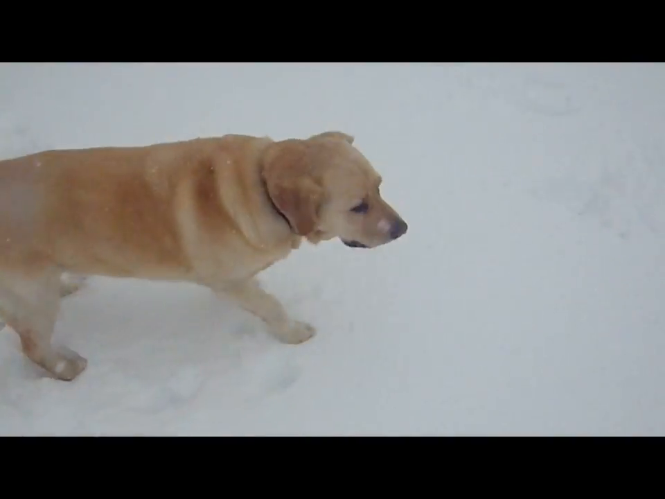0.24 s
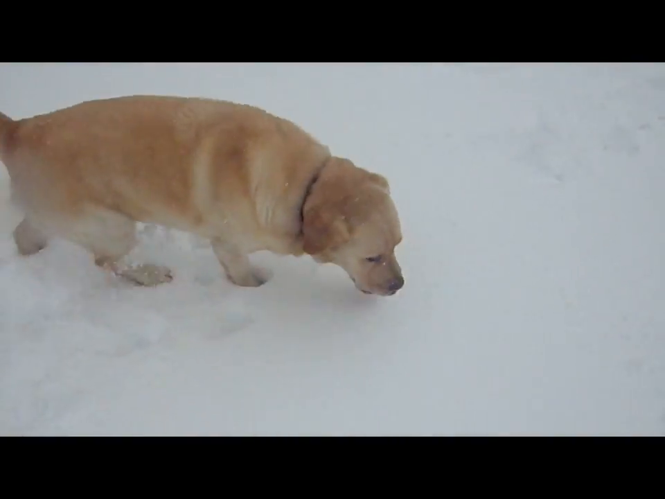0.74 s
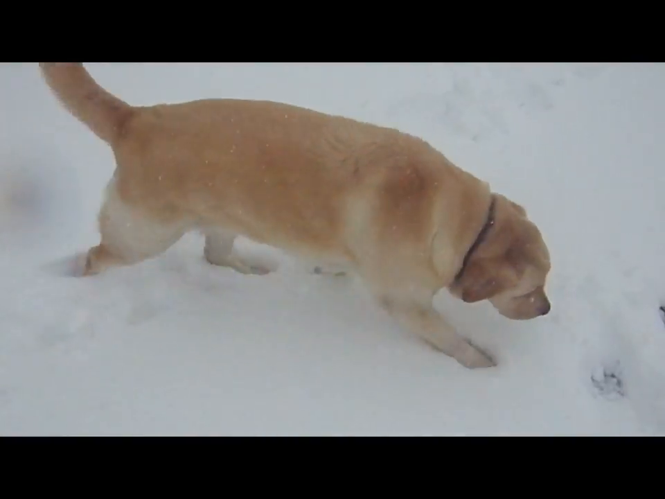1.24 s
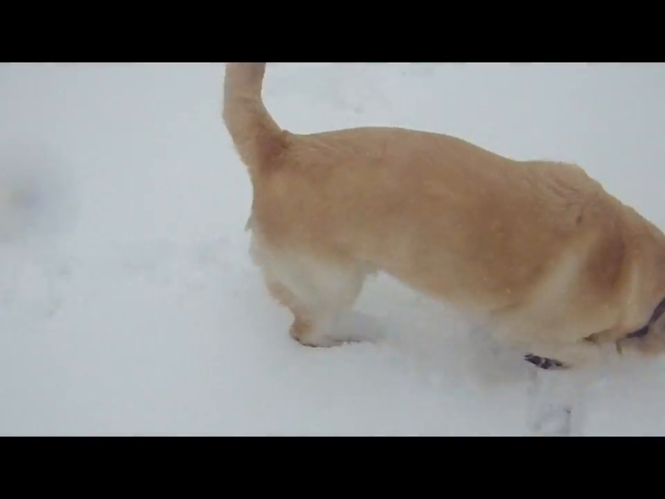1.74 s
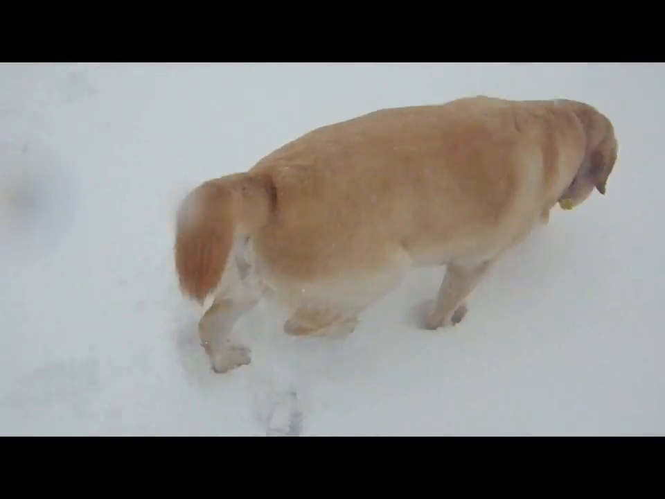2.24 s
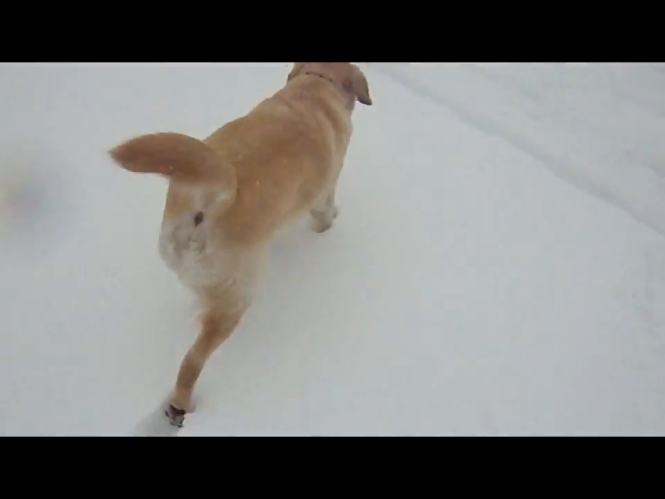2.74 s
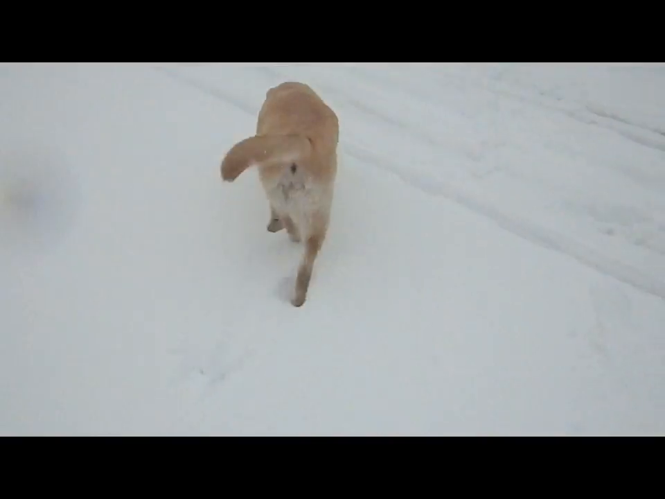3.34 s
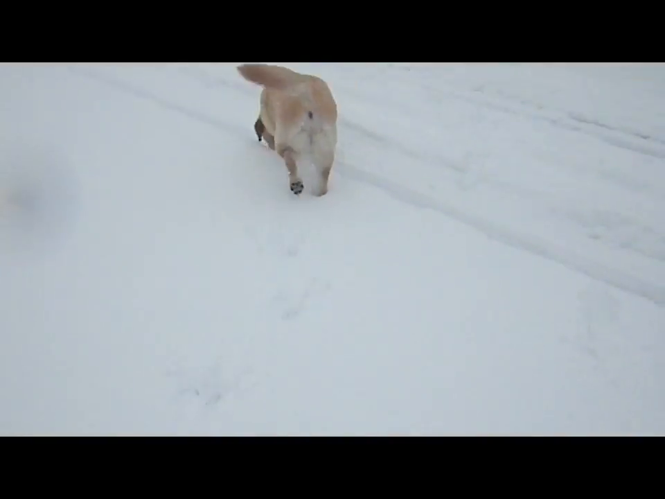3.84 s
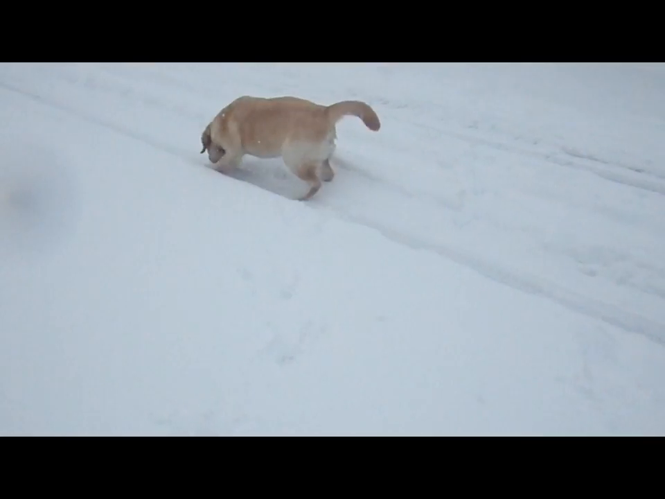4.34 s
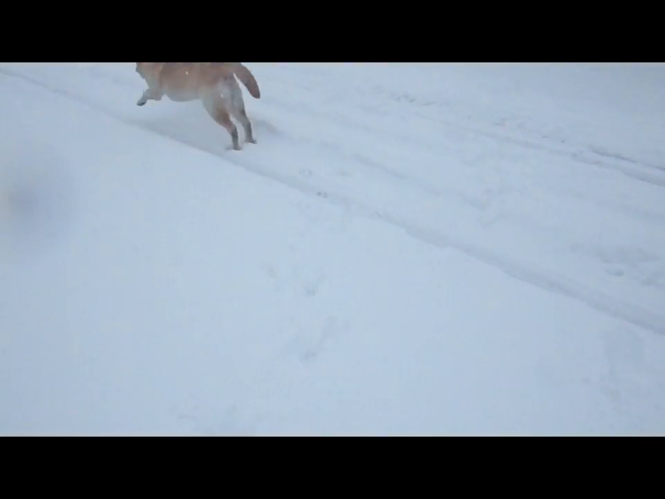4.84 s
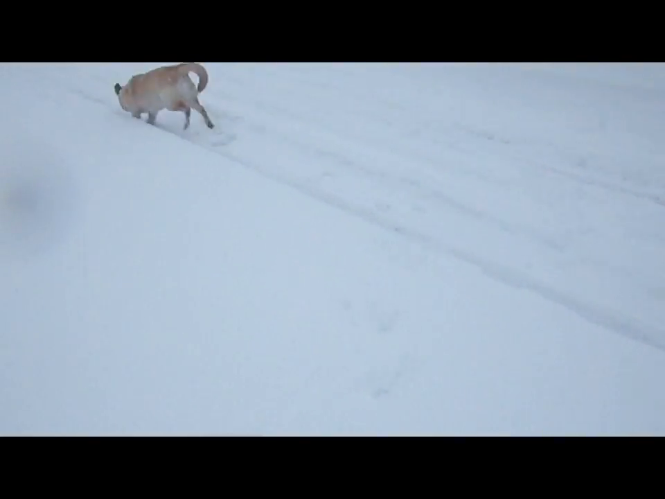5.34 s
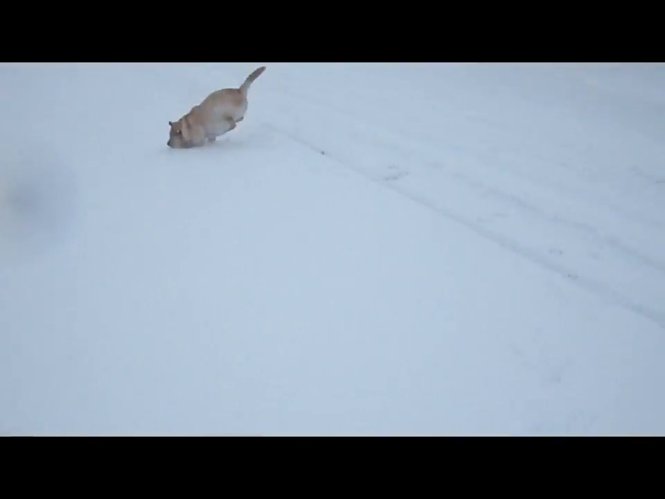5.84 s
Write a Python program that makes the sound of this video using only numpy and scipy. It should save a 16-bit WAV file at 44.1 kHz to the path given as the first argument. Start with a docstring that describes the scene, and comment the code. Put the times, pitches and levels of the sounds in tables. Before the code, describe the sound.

A dog trots through fresh snow, each step a soft, crisp crunch, about three a second. In the first second and a half, fluttering gusts rush over the close microphone and bump it, then settle to a light low breeze. Icy grains tick irregularly against the camera throughout, one much louder just past the middle. A few soft brushing sounds pass nearby. The open, snowy space has no echo.

```python
"""Dog trotting through fresh snow

A hand-held camera follows the dog while icy snow falls. The snow crunches: many tiny damped
tones, mixed with noise, swell under each step. Single ice grains tick on the camera's case: short
noise snaps and pings with ringing tones. Gusts of fluttering noise rush over the microphone
and bump it with short bursts and pressure swings, mostly in the first second and a half."""
import sys
import numpy as np
from scipy.fft import rfft, irfft, next_fast_len
from scipy.io import wavfile
from scipy.ndimage import map_coordinates

SR = 44100
rng = np.random.default_rng(int(sys.argv[2]) if len(sys.argv) > 2 else 0)


def to_wav(sig):
    """Store sig (one row per channel, or 1-D mono) as 16-bit WAV at the path in sys.argv[1].

    Samples outside -1..1 are clipped; the rate is SR.
    """
    pcm = np.clip(np.atleast_2d(sig), -1, 1) * 32767
    pcm = np.round(pcm).astype(np.int16)
    wavfile.write(sys.argv[1], SR, pcm.T)  # frames by channels


N = 269010  # length of the scene in samples


def amp(db):
    """Turn decibels into a gain."""
    return 10 ** (np.asarray(db) / 20)


def unit(x):
    """Scale a sound to an average (rms) level of 1."""
    return x / np.sqrt(np.mean(x ** 2) + 1e-20)


def wobble(rate):
    """Draw a smooth random curve through `rate` random points a second."""
    points = rng.standard_normal(int(N * rate / SR) + 4)
    return map_coordinates(points, [np.arange(N) * rate / SR])


def filtered(x, response):
    """Multiply the spectrum of x by a response that depends on frequency."""
    size = next_fast_len(len(x) + 4096)
    spectrum = rfft(x, size) * response(np.fft.rfftfreq(size, 1 / SR))
    return irfft(spectrum, size)[:len(x)]


def coloured(x, points):
    """Filter x with a curve through (Hz, dB) points, then bring it to rms 1."""
    point_hz, point_db = np.transpose(points)
    response = lambda hz: amp(np.interp(np.log(hz + 1), np.log(point_hz), point_db))
    return unit(filtered(x, response))


def add(track, s, sound):
    """Mix a sound into the track from time s, or from the very start if s is negative."""
    start = max(round(s * SR), 0)
    part = track[start:start + len(sound)]
    part += sound[:len(part)]


def turbulence():
    """Coarse flutter of air: the large, low whirls and the small, high ones come and go separately."""
    split_hz, large_db, small_db = 650, 1.8, 3.8
    low_pass = lambda hz: 1 / np.hypot(1, (hz / split_hz) ** 2)
    high_pass = lambda hz: (hz / split_hz) ** 2 / np.hypot(1, (hz / split_hz) ** 2)
    large = filtered(rng.standard_normal(N), low_pass)
    small = filtered(rng.standard_normal(N), high_pass)
    large_flutter = unit(amp(large_db * np.tanh(wobble(70))))
    small_flutter = unit(amp(small_db * np.tanh(wobble(110))))
    return large * large_flutter + small * small_flutter


def gusts():
    """Gusts swell and die over a light breeze: air rushes over the microphone above slow buffeting."""
    # Each row: peak time in seconds, rise and fall time constants of the rush in seconds,
    # rush level in dB, low buffeting level in dB.
    gust_rows = [(0.035, 0.1, 0.081, -35.5, -49), (0.27, 0.094, .03, -29.5, -44),
                 (0.34, 0.036, 0.036, -22, -44), (0.45, 0.074, 0.062, -19.5, -44),
                 (0.545, 0.067, 0.066, -17.3, -40), (0.605, .025, 0.081, -21.5, -37),
                 (0.895, .07, 0.057, -21.5, -39), (0.98, 0.066, 0.059, -20, -38),
                 (1.1, 0.11, 0.076, -16.5, -44), (1.17, 0.046, 0.065, -19, -40),
                 (1.235, .04, .045, -22, -29), (1.395, 0.027, 0.032, -25.5, -28),
                 (1.46, .03, 0.12, -31.5, -37), (2.05, 0.43, 0.65, -38.5, -43.5),
                 (3.36, 0.075, 0.26, -35.5, -37), (3.86, 0.046, 0.046, -41.5, -35),
                 (5.55, .25, 0.17, -48, -41.5), (5.985, 0.017, .25, -34.5, -43)]
    # Tone of the rush in a strong gust. Each row: frequency in Hz, relative level in dB.
    rush_colour = [(30, -46), (100, -7.5), (210, 1), (320, 0), (550, -4), (850, -8), (1300, -19),
                   (1900, -21.5), (2500, -43), (6000, -68)]
    # Tone of the low buffeting. Each row: frequency in Hz, relative level in dB.
    rumble_colour = [(12, -20), (28, 2), (60, 2.5), (120, -2.5), (220, -11.5), (500, -49), (1500, -70)]
    breeze_db, breeze_buffet_db = -53.5, -49
    buffet_lingers = 2.13  # buffeting swells and dies this many times more slowly than the rush
    gentle_db, strong_db = -34.5, -19.5  # rush levels that sound fully gentle and fully strong
    gentle_pitch = 0.71  # gentle air rushes at a lower pitch than a strong gust

    t = np.arange(N) / SR
    rush_power, buffet_power = amp(breeze_db) ** 2, amp(breeze_buffet_db) ** 2
    for s, rise, fall, rush_db, buffet_db in gust_rows:
        away = np.maximum((s - t) / rise, (t - s) / fall)  # distance from the peak in time constants
        rush_power = rush_power + (amp(rush_db) * np.exp(-away)) ** 2
        buffet_power = buffet_power + (amp(buffet_db) * np.exp(-away / buffet_lingers)) ** 2

    force = np.clip((10 * np.log10(rush_power) - gentle_db) / (strong_db - gentle_db), 0, 1)
    strong = coloured(turbulence(), rush_colour)
    gentle = coloured(turbulence(), [(hz * gentle_pitch, db) for hz, db in rush_colour])
    rush = np.sqrt(rush_power) * (np.sqrt(force) * strong + np.sqrt(1 - force) * gentle)
    buffeting = unit(amp(3.6 * np.tanh(wobble(25))))
    rumble = np.sqrt(buffet_power) * buffeting * coloured(rng.standard_normal(N), rumble_colour)
    return rush + rumble


def swells(rows, octaves, skirt_db):
    """Short swells of noise, each in a broad band around its own centre, with a quieter, longer skirt."""
    out, t = np.zeros(N), np.arange(-SR // 8, SR // 8) / SR
    for s, db, length, centre_hz in rows:
        core = np.exp(-np.pi / 2 * (t / length) ** 2)
        skirt = amp(skirt_db) * np.exp(-np.abs(t) / length / 2)

        def band(hz):
            """A bell around the centre, tilted gently towards the low side."""
            bell = np.exp(-.5 * (np.log2((hz + 1) / centre_hz) / octaves) ** 2)
            return bell * np.sqrt(centre_hz / (hz + centre_hz / 2))

        burst = filtered(rng.standard_normal(len(t)) * (core + skirt), band)
        # same energy as a steady sound of the given level and length
        add(out, s + t[0], amp(db) * burst * np.sqrt(length * SR / np.sum(burst ** 2)))
    return out


def bumps(rows, low_share, width_turns):
    """The core of an eddy is a dip of pressure between two smaller pushes."""
    out, t = np.zeros(N), np.arange(-SR // 40, SR // 40) / SR
    for s, db, length, centre_hz in rows:
        turns = low_share * centre_hz * t  # the swing is slower than the eddy's noise
        swing = -np.cos(2 * np.pi * turns) * np.exp(-(turns / width_turns) ** 2)
        add(out, s + t[0], amp(db) * swing * np.sqrt(length * SR / np.sum(swing ** 2)))
    return out


def eddies():
    """The strongest eddies bump the microphone with a burst of noise and a swing of pressure."""
    # Each row: time in seconds, level in dB, nominal length in seconds, nominal centre in Hz.
    eddy_rows = [(0.107, -35, .004, 330), (0.125, -30, 0.021, 230), (0.314, -27, 0.0047, 420),
                 (0.346, -25.5, 0.0074, 820), (0.533, -21, .005, 260), (0.562, -18.5, 0.0056, 300),
                 (0.703, -18.5, 0.0038, 332), (0.78, -18, 0.0055, 346), (0.812, -14.5, 0.008, 467),
                 (1.085, -13.5, 0.0065, 360), (1.106, -12.5, 0.0038, 330), (1.25, -15, 0.0046, 328),
                 (1.256, -18.5, 0.0077, 920), (1.268, -20.5, 0.0084, 750), (1.295, -23, .005, 450),
                 (1.326, -22.5, .005, 560), (1.359, -19, 0.0059, 520), (1.408, -9, 0.0068, 327),
                 (1.414, -18, 0.004, 700), (1.487, -26, 0.0045, 330), (1.563, -30, .012, 260),
                 (1.6, -25, .005, 230), (1.694, -27, 0.0055, 180), (1.919, -24, 0.0077, 320),
                 (1.998, -27, 0.0063, 240), (2.073, -27.5, 0.0098, 450), (2.096, -24.5, 0.005, 280),
                 (2.232, -17, 0.0032, 477), (2.233, -22, 0.0026, 1100), (2.245, -30.5, 0.013, 380),
                 (2.362, -23.5, 0.0051, 500), (2.774, -32, 0.015, 198), (4.695, -29, 0.0045, 187),
                 (6.066, -22.5, 0.0064, 278)]
    swing_db = -1  # level of the swing relative to the noise
    noise = swells(eddy_rows, octaves=1.0, skirt_db=-12.5)
    return noise + amp(swing_db) * bumps(eddy_rows, low_share=0.6, width_turns=0.53)


def brushing():
    """Soft brushing sounds close by are short swells of noise."""
    # Each row: time in seconds, level in dB, nominal length in seconds, nominal centre in Hz.
    brush_rows = [(2.53, -36.5, 0.079, 550), (3.1, -35, 0.046, 704), (3.42, -33.5, 0.04, 1250),
                  (4.432, -31.5, 0.017, 1280), (4.452, -25, 0.015, 690), (4.5, -38, 0.08, 740)]
    return swells(brush_rows, octaves=0.58, skirt_db=-10)


def small_ticks():
    """Small grains land at random, each with its own size and pitch."""
    per_s, scatter_db = 7, 1
    usual_hz, spread_octaves = 8930, 0.26
    tick_db, panel_db, case_db, knock_db = -34.5, -43, -45, -51
    rows = []
    for _ in range(int(per_s * N / SR)):
        size_db = rng.normal(0, scatter_db)
        hz = usual_hz * 2 ** rng.normal(0, spread_octaves)
        s = rng.random() * N / SR
        levels = [db + size_db for db in (tick_db, panel_db, case_db, knock_db)]
        rows.append((s, *levels, hz))
    return rows


def ring(modes, t, attack):
    """A part of the camera rings with a new balance, tuning and damping for each place that is hit."""
    detune, scatter_db, damping_spread = .025, 2.5, .25
    damping = np.exp(rng.normal(0, damping_spread))
    total = 0
    for hz, db, t60 in modes:
        decay = amp(db + rng.normal(0, scatter_db) - 60 * damping * t / t60)
        mode_hz = hz * (1 + rng.normal(0, detune))
        total = total + decay * np.sin(2 * np.pi * (mode_hz * t + rng.random()))
    return unit(total * (1 - np.exp(-t / attack)))


def ice_ticks():
    """Grains snap, ping and ring the camera; its case builds up more slowly than its panel and dull knock."""
    # Large ice grains hitting the camera. Each row: time in seconds, tick level in dB, panel ring
    # level in dB, case ring level in dB, dull knock level in dB, ping frequency in Hz.
    large_ticks = [(0.195, -30.5, -36.5, -49, -46, 8800), (0.203, -30, -38, -47, -46, 12600),
                   (0.2414, -23, -36, -48, -53, 7540), (0.425, -25, -36, -56, -52, 8700),
                   (0.4551, -29, -50, -42, -50, 8850), (1.046, -22.5, -24, -53, -50, 9750),
                   (1.5007, -30.5, -48, -53, -53, 11500), (1.5526, -28.5, -40, -50, -46, 8500),
                   (1.866, -27.5, -41.5, -56, -41, 5840), (2.2153, -23, -32, -38, -48, 10300),
                   (2.2338, -25.5, -44, -50, -47, 9700), (2.8697, -32, -29.5, -37.5, -43, 8200),
                   (2.9668, -33.5, -36.5, -42, -60, 11000), (3.1023, -27, -36, -41, -48, 7850),
                   (3.1371, -26.5, -34, -58, -52, 8150), (3.333, -23, -46, -55, -50, 9540),
                   (3.3776, -20, -49, -32, -38, 8300), (3.639, -24.5, -52, -42, -43.5, 8500),
                   (3.686, -18, -12.5, -18, -27.5, 9900), (3.7772, -25, -37, -30.5, -44, 7840),
                   (3.8668, -25.5, -35, -36, -47, 8800), (3.9885, -29, -41, -44, -43, 8500),
                   (4.0013, -17.5, -36, -40, -41, 10200), (4.0223, -29.5, -38, -62, -56, 9600),
                   (4.1653, -36.5, -36, -61, -58, 8300), (4.1993, -24, -32, -59, -53, 9100),
                   (4.2324, -20.5, -38, -41, -40.5, 8700), (4.574, -34, -42, -56, -45, 9500),
                   (4.6264, -21, -53, -55, -52, 9600), (4.659, -23, -36, -41, -50, 13200),
                   (4.848, -33, -40, -34, -42, 9000), (4.8629, -23, -31, -33, -34.5, 10000),
                   (4.9355, -26, -28, -52, -54, 8800), (4.9457, -30, -32.5, -48, -51, 8500),
                   (4.956, -42, -44, -38, -54, 9000), (5.016, -32, -43, -41, -47, 9000),
                   (5.0419, -37, -32, -32.5, -30.5, 7000), (5.1096, -28, -34.5, -33.5, -42, 10900),
                   (5.1785, -25.5, -38, -37, -53, 10200), (5.2186, -23, -33, -24.5, -36, 7950),
                   (5.3065, -30.5, -38, -53, -52, 8500), (5.4643, -36, -38, -52, -50, 11400),
                   (5.522, -29.5, -31.5, -48, -44, 9400), (5.5933, -32.5, -35, -48, -44, 9000),
                   (5.7734, -28.5, -34.5, -28, -37, 7100), (5.799, -30, -39, -38, -54, 9000),
                   (5.843, -27, -30.5, -41, -42, 12300)]
    # Tone of the snap before its tilt. Each row: frequency in Hz, relative level in dB.
    snap_colour = [(500, -6.5), (2000, -7.5), (5000, -6), (7000, 3.5), (10000, 4), (12200, -1),
                   (15500, -4.5)]
    # Resonances of the panel, the case and the dull knock. Each row: nominal frequency in Hz,
    # nominal relative level in dB, nominal time to fall by 60 dB in seconds.
    panel_modes = [(3720, -2.5, 0.0027), (3970, 3, 0.0036)]
    case_modes = [(1690, -7, 0.0057), (1777, 4, 0.013)]
    knock_modes = [(480, -3, 0.0051), (756, 2.5, .003), (1160, -3.5, 0.015)]

    out, t = np.zeros(N), np.arange(SR // 50) / SR
    contact = 1 - np.exp(-t / 0.00062)
    for s, tick_db, panel_db, case_db, knock_db, hz in large_ticks + small_ticks():
        # ticks with a higher ping also snap more brightly
        tilt_db = 14 * np.log2(hz / 9000)
        colour = [(f, db + tilt_db * max(np.log2(f / 7000), 0)) for f, db in snap_colour]
        snap = coloured(rng.standard_normal(len(t)) * contact * amp(-60 * t / 0.0033), colour)
        ping = unit(np.sin(2 * np.pi * hz * t) * contact * amp(-60 * t / 0.0016))
        tick = amp(tick_db) * unit(snap + amp(-1) * ping)
        panel = amp(panel_db) * ring(panel_modes, t, attack=0.0001)
        case = amp(case_db) * ring(case_modes, t, attack=0.00065)
        knock = amp(knock_db) * ring(knock_modes, t, attack=0.00038)
        add(out, s, tick + panel + case + knock)
    return out


def grains(rate, centre_hz, spread, cycles, scatter_db):
    """Tiny fractures at random moments: damped sines, most weak and a few strong."""
    count = int(rate * N / SR)
    when, size = rng.random((count, 2)).T
    hz = centre_hz * np.exp(spread * rng.standard_normal((count, 1)))
    hz = np.clip(hz, 500, 15000)
    k = np.arange(96)  # each fracture lasts 96 samples
    turns = hz * k / SR
    rank = np.minimum(-np.log(1 - size), 3)  # mostly small, limited to 3
    strength = amp(scatter_db * rank)
    rings = strength[:, None] * np.sin(2 * np.pi * turns) * np.exp(-turns / cycles)
    places = (when * N).astype(int)[:, None] + k
    return unit(np.bincount(places.ravel(), rings.ravel(), N)[:N])


def snow():
    """Under each step crystals break in clumps with a fine hiss; the snow beneath packs and crumbles."""
    # Feet sinking into the snow, the first already under way. Each row: start in seconds, time until
    # the weight eases in seconds, crisp crunch level in dB, dull packing level in dB.
    steps = [(-0.05, 0.037, -54, -43.5), (0.222, 0.48, -33.5, -42.5), (0.52, 0.18, -37.5, -61),
             (0.772, 0.042, -44, -57), (0.933, 0.15, -35, -42), (1.21, 0.14, -34, -41),
             (1.416, 0.24, -33.5, -39), (1.836, 0.27, -34.5, -39.5), (2.273, 0.29, -31.5, -38),
             (2.755, 0.11, -32.5, -38.5), (3.046, 0.43, -33, -41), (3.58, 0.27, -35.5, -41),
             (4.053, 0.035, -44, -45), (4.178, 0.25, -34, -43.5), (4.56, 0.28, -37, -46.5),
             (4.922, 0.19, -35.5, -44.5), (5.137, 0.38, -33.5, -43.5), (5.68, 0.19, -37, -46),
             (5.923, 0.2, -33, -41.5)]
    # Tones of the crunch, the brightest snaps and the packing. Each row: frequency in Hz, gain in dB.
    crisp_colour = [(250, -7.5), (600, 2.5), (1500, -5), (2500, -3.5), (3800, -2.5), (5000, -2),
                    (6800, 3.5), (9500, 1.5), (11000, -3), (12200, -15), (13200, -4), (15000, -20),
                    (16000, -67)]
    sparkle_colour = [(1500, -22), (4000, -1.5), (7000, 8.5), (10000, 2.5), (12200, -3), (13300, 0),
                      (15600, -10)]
    packing_colour = [(100, -13), (300, -36), (600, 2.5), (1000, -0.5), (1400, 2.5), (1780, 8), (2200, -9),
                      (3200, -24), (6000, -15.5)]
    attack_s, release_s = 0.047, 0.25  # the weight comes on quickly and eases off
    uneven_db, uneven_per_s = 1.0, 13  # the snow gives way unevenly
    floor_db = -41  # the crisp sound never quite stops between steps

    t = np.arange(N) / SR
    crisp_power, press_power = amp(floor_db) ** 2, 0
    for s, length, crisp_db, press_db in steps:
        onset = np.clip((t - s) / attack_s, 0, 1)
        weight = onset * np.exp(-np.maximum(t - s - length, 0) / release_s)
        crisp_power = crisp_power + (amp(crisp_db) * weight) ** 2
        press_power = press_power + (amp(press_db) * weight) ** 2

    clumps = amp(3.6 * np.tanh(wobble(100)))
    fractures = grains(rate=2100, centre_hz=6220, spread=0.56, cycles=1.03, scatter_db=4.5)
    breaks = unit(clumps * fractures)
    crisp = coloured(breaks + amp(-4.5) * rng.standard_normal(N), crisp_colour)
    # a few of the smallest crystals snap singly, very brightly
    bright_snaps = grains(rate=130, centre_hz=11200, spread=0.23, cycles=1.3, scatter_db=2.0)
    sparkle = coloured(bright_snaps, sparkle_colour)
    crumbling = grains(rate=900, centre_hz=1610, spread=0.41, cycles=0.87, scatter_db=3.0)
    crumbs = unit(clumps * crumbling)
    packing = coloured(crumbs + amp(5.5) * rng.standard_normal(N), packing_colour)

    uneven = amp(uneven_db * wobble(uneven_per_s))
    crunch = np.sqrt(crisp_power) * (crisp + amp(-6.5) * sparkle)
    return uneven * (crunch + np.sqrt(press_power) * packing)


def scene():
    """Add up all the sources; open snow gives no echo."""
    wind = gusts() + eddies()
    return (wind + brushing() + ice_ticks() + snow())[None]


def record(dry):
    """The camera blocks steady pressure, has a narrow treble notch, clips at full scale and limits the band."""
    notch_hz, width_hz, low_cut_hz, top_hz = 7900, 380, 10, 16100
    notch = lambda hz: (notch_hz ** 2 - hz ** 2) / (notch_hz ** 2 - hz ** 2 + 1j * hz * width_hz)
    low_cut = lambda hz: hz / (hz - 1j * low_cut_hz)
    band_limit = lambda hz: 1 / np.sqrt(1 + (hz / top_hz) ** 120)
    heard = filtered(dry[0], lambda hz: notch(hz) * low_cut(hz))
    return filtered(np.clip(heard, -1, 1), band_limit)[None]


dry = scene()
out = record(dry)
to_wav(out)
```